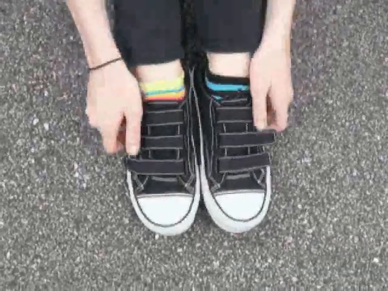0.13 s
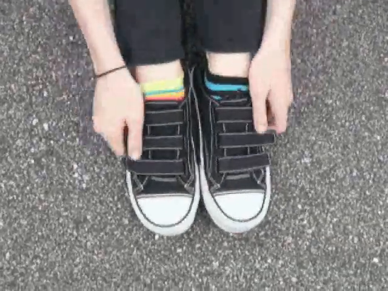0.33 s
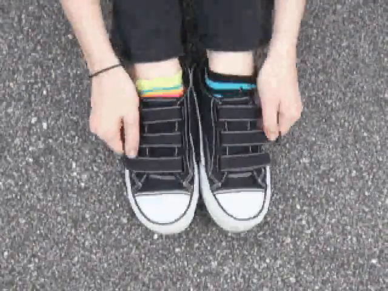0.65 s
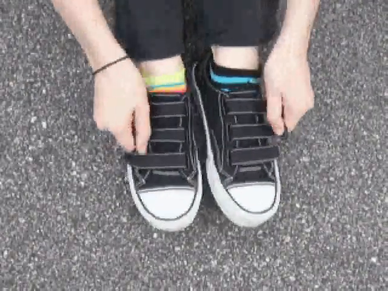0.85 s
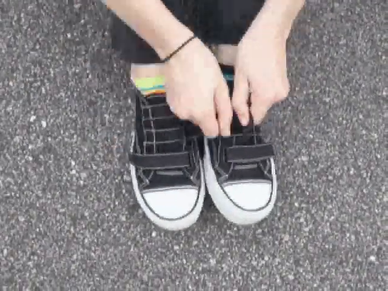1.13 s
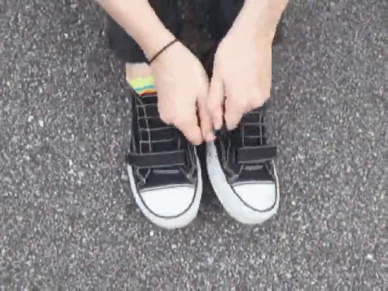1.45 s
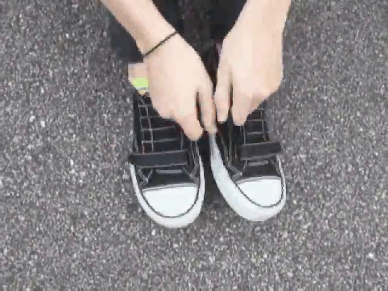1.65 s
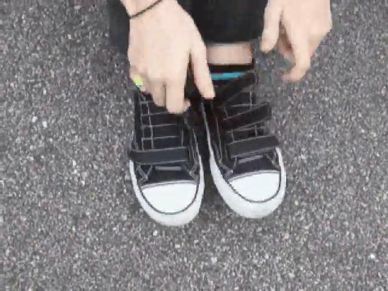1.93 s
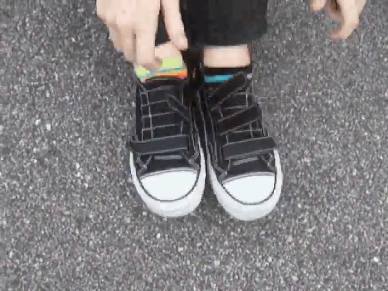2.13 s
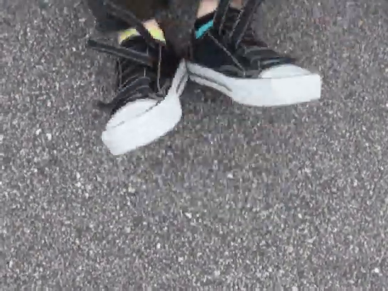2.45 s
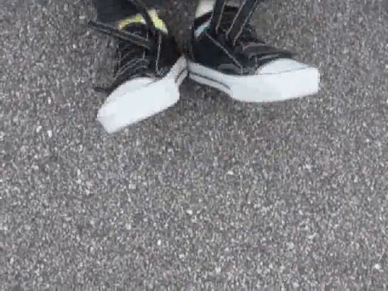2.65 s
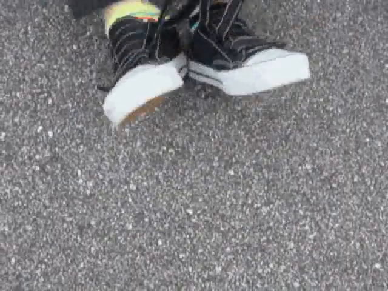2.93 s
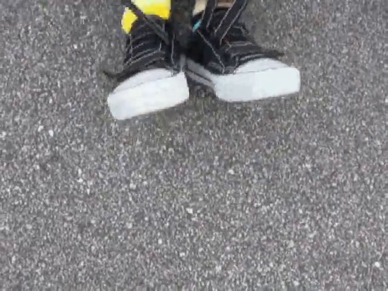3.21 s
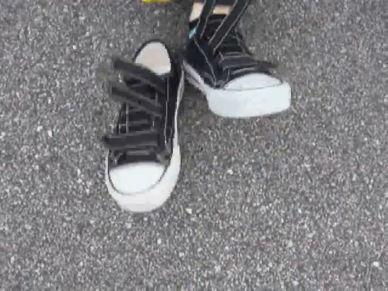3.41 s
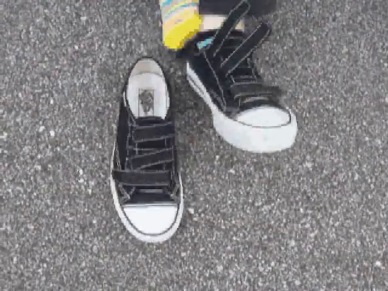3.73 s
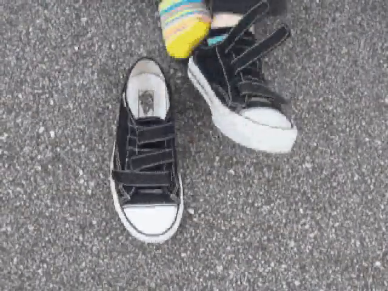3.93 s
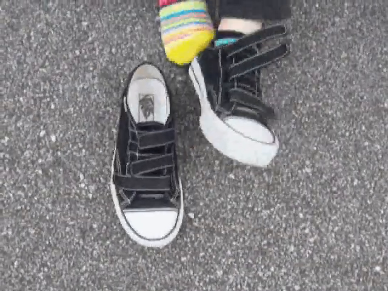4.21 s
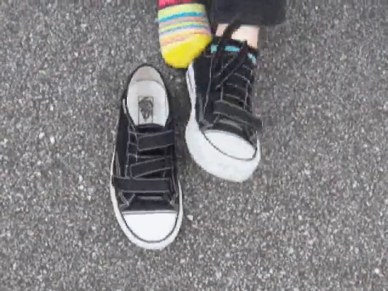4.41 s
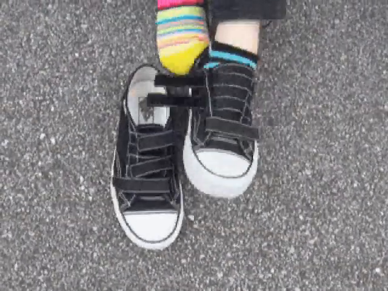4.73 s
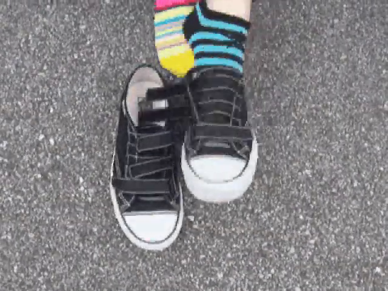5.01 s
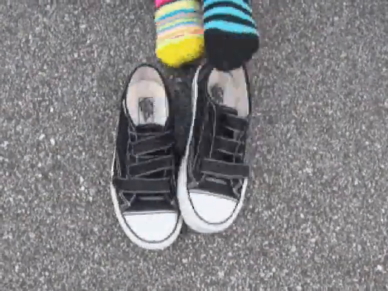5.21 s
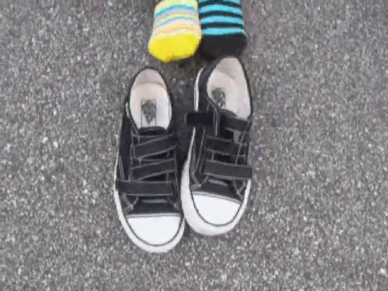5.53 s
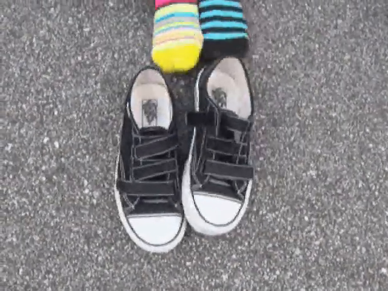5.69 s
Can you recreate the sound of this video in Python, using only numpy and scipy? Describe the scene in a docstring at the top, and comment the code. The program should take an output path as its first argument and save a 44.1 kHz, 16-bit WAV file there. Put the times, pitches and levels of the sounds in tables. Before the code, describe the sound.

Katydids chirr throughout in short, high pulses, about three a second, with a faint cricket trill, a soft outdoor rumble and a low microphone buzz; the top end is thin and glassy. At about 0.6 seconds, close by, single hooks of a sneaker's hook-and-loop strap start snapping. The straps rip open in quick, brightening tugs from 0.7 to 1.2 seconds, with another short rip at 1.3. Between 2.1 and 2.3 seconds rubber squeaks on rubber several times. Socks rub softly out of canvas shoes from 2.5 to 3.4 seconds. At 3.5 a sole slaps onto asphalt, the loudest sound, and settles with a few small bounces. Lighter gritty ticks and knocks come between 4.6 and 4.8 seconds, then a sock slide at 5.0, a soft thud and one more faint rub. From about 5.5 to 5.8 seconds a faint, hoarse note sounds far away, sagging slightly in pitch.

```python
"""Katydids and a cricket call throughout, under a small camera's low buzz and thin glassy top.
Someone sitting on asphalt rips open the hook-and-loop straps of two canvas sneakers: single hooks
snap, then hundreds, ringing the taut strap. After 2 s rubber squeaks on rubber by stick-slip and socks
slide out. At 3.5 s a sole slaps down and rings in its damped modes; softer knocks and slides follow,
and a faint, hoarse note sounds far away at the end."""
import sys
import numpy as np
from scipy import signal
from scipy.fft import rfft, irfft
from scipy.io import wavfile
from scipy.ndimage import uniform_filter1d

SR = 44100
rng = np.random.default_rng(int(sys.argv[2]) if len(sys.argv) > 2 else 0)


def generate_wav(sig):
    """Save sig (samples, or channels by samples) to the path in sys.argv[1] as 16-bit PCM at SR."""
    pcm = np.round(np.clip(np.atleast_2d(sig).T, -1, 1) * 32767).astype(np.int16)
    wavfile.write(sys.argv[1], SR, pcm)


N = 258426
T = np.arange(N) / SR
BAND_HZ, TOP_HZ = 8100, 15950  # upper edges of the camera's band and of its mirror image

# spectrum of a snap on a slack and on a taut strap: f/Hz, level/dB
SLACK_SNAP = [(200, -21), (800, -14), (1150, -7.5), (1330, -8), (1570, 0.5), (1850, -6.5), (2600, 3),
              (3700, -5), (5000, 0.5), (6200, -9.5), (7200, -7), (9000, -16.5)]
TAUT_SNAP = [(150, -12), (400, 0.5), (1200, -8.5), (1550, -2), (1850, -8), (2500, 0), (3200, 0.5),
             (3800, -4), (4900, -2.5), (6000, 0.5), (6700, 2), (7300, 2), (7700, -5.5), (9000, 5.5)]
# resonances of strap and canvas: f/Hz, bandwidth/Hz, gain/dB
STRAP_MODES = [(574, 240, -8), (1012, 128, 4.5)]
# tugs: start/s, end/s, snap level/dB, drumming re snaps/dB, swell/s, fade/s, fade depth/dB
TUGS = [(0.737, 0.785, -28, -29, 0.0033, 0.038, 3), (0.784, 0.827, -26.5, -20, 0.0078, 0.029, 16),
        (0.825, 1.001, -26, -8.5, 0.006, 0.027, 2.5), (0.998, 1.207, -25, -9, 0.013, 0.086, 18.5),
        (1.28, 1.366, -25, -9, 0.062, 0.01, 12)]
# stray hooks crackling ahead of a tug: start/s, end/s, level/dB
CRACKLES = [(0.684, 0.74, -43), (1.249, 1.29, -44)]
# single hooks snapping around the tugs, and one late tick as the foot slides out: t/s, relative level/dB
SINGLE_SNAPS = [(0.6101, -23.5), (0.6279, -20), (0.637, -20), (0.6545, -17.5), (0.6806, -22.5),
                (0.6934, -23), (0.6977, -18.5), (0.7142, -20), (0.7208, -19), (0.7398, -13), (0.8006, -13),
                (0.8302, -13), (1.225, -23), (1.261, -16), (2.9158, -23)]
def straps(taut_s=0.9, tighten_s=0.031, swell_db=15):
    """Impulsive excitation: snapping hooks drive the strap's modes, faster and brighter under tension."""
    tension = (1 + np.tanh((T - taut_s) / tighten_s / 2)) / 2
    slack = snapping(SLACK_SNAP, rate=1700, spread_db=4.0)
    taut = snapping(TAUT_SNAP, rate=3800, spread_db=3.5)
    snaps = np.sqrt(1 - tension) * slack + np.sqrt(tension) * taut
    snaps *= undb(1.1 * walk(200))  # whole rows of hooks give way together
    modes = sum(undb(db) * resonate(snaps, hz, width) for hz, width, db in STRAP_MODES)
    drum = steady(resonate(modes, hz=970, width=910))
    out = np.zeros(N)
    for start, end, db, drum_db, swell, fade, fade_db in TUGS:
        effort_db = db - swell_db * (1 - ramp(start, swell)) - fade_db * ramp(end - fade, fade)
        out += during(start, end, edge=.004) * undb(effort_db) * (snaps + undb(drum_db) * drum)
    strays = snapping(SLACK_SNAP, rate=900, spread_db=8.0)
    for start, end, db in CRACKLES:
        out += during(start, end, edge=.003) * undb(db) * strays
    for s, db in SINGLE_SNAPS:
        add(out, s, undb(db - 3) * click(SLACK_SNAP, ripple_db=2.5))
        for lag in rng.uniform(-0.0026, 0.005, size=4):  # fainter snaps cluster around it
            add(out, s + lag, undb(db - 19) * click(SLACK_SNAP, ripple_db=3.0))
    return out


def snapping(spectrum, rate, spread_db, patches=9):
    """Superposition: patches of hooks let go along the peel line, each with its own impulse response."""
    out = np.zeros(N)
    for _ in range(patches):
        releases = grains(rate / patches, spread_db) * undb(2.5 * walk(22))
        ring = level(click(spectrum, ripple_db=4.0))
        out += signal.oaconvolve(releases, ring)[:N]
    return steady(out, size=700)


# squeaks: t/s, duration/s, first slip rate/Hz, target slip rate/Hz, glide/s, level/dB, roughness (0-1)
RUBBER_SLIPS = [(2.09, 0.017, 1900, 1074, 0.011, -38, 0.75), (2.125, 0.023, 560, 1305, 0.02, -34.5, 0.7),
                (2.148, 0.037, 784, 1344, 0.026, -33.5, 0.4), (2.241, 0.0135, 1150, 1458, 0.015, -39, 0.46),
                (2.264, 0.047, 704, 1632, 0.05, -36.5, 0.69)]
def slipping(fade_db=10.5, clearing=0.83):
    """Slip rate sets pitch: each squeak starts rough, then glides to a cleaner note and fades."""
    hz, rough, gain = np.full(N, 1000.), np.zeros(N), np.zeros(N)
    for start, length, from_hz, to_hz, glide, db, first_rough in RUBBER_SLIPS:
        progress, begun = ramp(start, length), T > start - .002
        bend = np.sin(np.pi / 2 * progress * length / glide) ** 2
        hz = np.where(begun, from_hz + (to_hz - from_hz) * bend, hz)
        rough = np.where(begun, first_rough * (1 - clearing * progress), rough)
        envelope = during(start, start + length, edge=0.0042) * undb(db - fade_db * progress ** 3)
        gain = np.maximum(gain, envelope)
    return hz, np.clip(rough, 0, 1), gain


def squeak(hz, rough, gain):
    """Stick-slip oscillation: rubber on rubber rings the shoe with harmonics; uneven slips rasp."""
    phase = 2 * np.pi * np.cumsum(hz * (1 + 0.192 * rough * walk(900))) / SR
    tone = sum(np.sin(k * phase + k * k) * (k * hz < BAND_HZ) for k in np.arange(1, 10))
    tone *= undb(6.8 * rough * walk(1000))
    rasp = rng.standard_normal(N) * (1 + np.cos(phase))
    shoe = [(300, 1), (600, 4.5), (1300, -1.0), (1900, -6), (2500, -3.5),  # f/Hz, gain/dB
            (3400, -8.0), (4400, -7.5), (5500, -13.5), (8000, -26)]
    return gain * steady(shaped(level(tone) + 0.72 * rough * level(rasp), shoe), size=350)


# soles landing: t/s, thud peak/dB, tick re thud/dB, pitch factor, dulling/(dB per octave)
LANDINGS = [(3.5306, -25, -9, 0.81, -2.5), (3.537, -26, -16, 1.05, 0), (3.5456, -2.5, -14, 0.99, 0),
            (3.5595, -27.5, 2.5, 0.93, 9), (3.640, -27.5, -10, 1.05, 12), (3.668, -34, -1, 1, 2),
            (3.674, -30, -11, 0.7, 7), (4.579, -47, 13.5, 0.81, 0), (4.656, -28, 8.5, 0.88, 7),
            (4.7745, -34, 11.5, 0.91, 3), (5.125, -35, -27, 0.86, 6)]
# modes of the hollow rubber sole: f/Hz, T60/s, level/dB
SOLE_MODES = [(232, 0.0073, -36), (536, 0.0039, -19), (641, 0.019, 6.5), (1017, 0.013, 5.5),
              (1202, 0.0098, 0.5), (1440, 0.047, -32), (2510, 0.019, -13), (3200, 0.0082, -3.5)]
# spectrum of a tick of grit: f/Hz, level/dB
GRIT_TICK = [(400, -33), (1100, 5), (1800, -8.5), (2500, 6), (3300, -7), (4000, -4.5), (5000, -11.5),
             (6200, -9), (9000, -30)]
def slaps():
    """Damped vibration: grit ticks, then the sole lands and thuds, some landings duller than others."""
    out, t = np.zeros(N), T[:SR // 10]
    for s, db, tick_db, pitch, dull_db in LANDINGS:
        thud = np.zeros(len(t))
        for hz, t60, mode_db in SOLE_MODES:
            decay = undb(mode_db - dull_db * np.log2(hz) - 60 * t / t60)
            thud += decay * np.sin(2 * np.pi * hz * pitch * t)
        thud *= 1 - np.exp(-(t / 0.00086) ** 2)  # soft rubber takes a moment to load
        add(out, s + .0006, undb(db) * thud / np.abs(thud).max())
        add(out, s, undb(db + tick_db) * click(GRIT_TICK, ripple_db=1.8))
    return out


# strokes of sock on canvas: peak t/s, level/dB, rise/s, fall/s
SOCK_STROKES = [(2.51, -54, 0.046, 0.021), (2.85, -51.5, 0.042, 0.071), (3.04, -47.5, 0.067, 0.05),
                (3.14, -50, 0.027, 0.032), (3.42, -61, 0.21, 0.12), (4.7, -52, 0.04, 0.05),
                (5.005, -45.5, 0.03, 0.095), (5.35, -55, 0.06, 0.022)]
# spectrum of rubbing cloth: f/Hz, level/dB
CLOTH_RUB = [(200, 2.5), (530, 15.5), (750, 4.5), (1500, -6.5), (2600, 4.5), (4000, -1.5), (6000, -2),
             (7300, -9), (9000, -8)]
def slide():
    """Friction noise: fibres catch and release as a heel works out, in strokes that swell and die away."""
    fibres = grains(rate=2500, spread_db=6)
    power = sum(undb(db) ** 2 * np.exp(-((T - s) / np.where(T < s, rise, fall)) ** 2)
                for s, db, rise, fall in SOCK_STROKES)
    return shaped(fibres, CLOTH_RUB) * np.sqrt(power) * undb(2.2 * walk(45))


# calls of the nearest katydid: t/s
NEAR_CALLS = [.181, .575, .95, 1.30, 1.637, 2.058, 2.389, 2.698, 3.021, 3.365, 3.775, 4.176, 4.529, 4.875,
              5.281, 5.623]
def katydids():
    """Independent sources add: a near katydid, a far one on an even beat and a lower, slower one."""
    far_calls = 0.285 + 0.45 * np.arange(14)
    low_calls = 0.235 + 0.527 * np.arange(11)
    near = katydid(NEAR_CALLS, -51, hz=5070, fall_hz=114.6, length=.009, period=.0415,
                   swell_db=0.96, scrape_hz=90)
    far = katydid(far_calls, -63, hz=5260, fall_hz=232, length=.013, period=.035,
                  swell_db=2.0, scrape_hz=130)
    low = katydid(low_calls, -58, hz=4670, fall_hz=126, length=.01, period=.037,
                  swell_db=1.0, scrape_hz=110)
    return near + far + low


def katydid(calls, call_db, hz, fall_hz, length, period, swell_db, scrape_hz):
    """Stridulation: three wing strokes of rising level, each sinking and fading as the wing slows."""
    out, t = np.zeros(N), T[:SR // 12]
    u = (t - t.mean()) / length  # stroke lengths from the peak
    envelope = np.where(u < 0, 1 / (1 + 3 * u ** 4), 1 / np.sqrt(1 + 3 * u ** 2)) * np.hanning(len(t))
    for s in calls:
        db = call_db + 0.5 * rng.standard_normal()
        for k in range(3):
            scrape = level(uniform_filter1d(rng.standard_normal(len(t)), size=30))
            pitch = hz + 25 * rng.standard_normal() - fall_hz * np.logaddexp(0, 2 * u)
            stroke = np.sqrt(2) * np.sin(phase_of(pitch + scrape_hz * scrape)) * envelope
            add(out, s + k * period - t.mean(), stroke * undb(db + swell_db * k))
    return out


# spectrum of the outdoor air: f/Hz, relative density/dB
AIR_SPECTRUM = [(20, 0), (30, 4), (42, -6), (100, -4), (200, -9), (400, -15.5), (700, -21), (1300, -25.5),
                (2200, -28), (4000, -30), (6000, -32), (7300, -33.5), (9000, -36)]
def air():
    """Ambient noise: a broad spectrum, strongest in the bass, whose level drifts."""
    return level(shaped(rng.standard_normal(N), AIR_SPECTRUM), -43.5) * undb(0.72 * walk(5.1))


def chorus(hz=4825, width=560):
    """Incoherent summation: distant katydids merge into a narrow, throbbing band of noise."""
    strokes = np.cos(phase_of(23 + 3 * walk(4.9)))
    band = level(resonate(resonate(rng.standard_normal(N), hz, width), hz, width))
    return band * undb(-62 + 2.5 * strokes + 1.5 * walk(10))


def cricket():
    """Modulation: the wing beat varies one tone in frequency and amplitude, making a trill."""
    wing = phase_of(50 + .5 * walk(3.4))
    song = np.sin(phase_of(3490 - 50 * np.sin(wing) + 85 * walk(700)))
    return level(song * (1 + .8 * np.cos(wing)), -64) * undb(2.2 * walk(30))


def far_note():
    """Frequency jitter makes a faint, distant note hoarse; its pitch sags a little."""
    hz = np.interp(T, [5.5, 5.8], [1195, 1150]) + 32 * walk(400)
    tone = level(np.sin(phase_of(hz)), -58.5)
    return tone * undb(1.3 * walk(40)) * during(5.47, 5.82, edge=0.072)


def buzz(frame_hz=29.97):
    """Periodic pulses: the camera's electronics tick once a frame, weakly between, over a wavering hum."""
    since = (T - .0287) % (1 / frame_hz)
    between = (since + .5 / frame_hz) % (1 / frame_hz)
    ticks = sum(g * t * np.exp(-t / .0011) for g, t in [(0.86, since), (0.23, between)])
    ticks = -level(ticks - ticks.mean(), -47.5) * undb(1.9 * walk(25))
    hum = -np.cos(2 * np.pi * 2 * frame_hz * since) * (1 + 1.6 * walk(12))
    return ticks + level(hum, -56)


def gain_control(x, threshold_db=-8, share=0.72, attack_s=0.045, recover_db_per_s=0.64):
    """Compression: a peak over the threshold turns the gain down; it creeps back over seconds."""
    excess_db = np.maximum(20 * np.log10(np.abs(x) + 1e-9) - threshold_db, 0)
    recovery_db = recover_db_per_s * T
    cut_db = np.maximum.accumulate(share * excess_db + recovery_db, axis=-1) - recovery_db
    pole = np.exp(-1 / (attack_s * SR))
    return x * undb(-signal.lfilter([1 - pole], [1, -pole], cut_db))


def undb(db):
    """Decibels to amplitude ratio."""
    return 10 ** (np.asarray(db) / 20)


def level(x, db=0):
    """Set the rms level."""
    return x * undb(db) / np.sqrt(np.mean(x ** 2) + 1e-18)


def phase_of(hz):
    """Phase is the time integral of frequency."""
    return 2 * np.pi * np.cumsum(hz) / SR


def ramp(start, length):
    """Linear rise from zero to one."""
    return np.clip((T - start) / max(length, 1e-4), 0, 1)


def during(start, end, edge):
    """Trapezoidal window between two times."""
    return np.clip(np.minimum(T - start, end - T) / edge + .5, 0, 1)


def add(out, s, x):
    """Superpose a short sound at time s."""
    i = max(int(s * SR), 0)
    out[i:i + len(x)] += x[:max(N - i, 0)]


def colour(points, hz):
    """Spectrum level in dB, interpolated over log frequency."""
    f, db = np.transpose(points)
    return np.interp(np.log(hz + 1), np.log(f), db)


def shaped(x, points):
    """Filtering by multiplication of spectra; rms 1."""
    return level(irfft(rfft(x) * undb(colour(points, np.fft.rfftfreq(N, 1 / SR))), N))


def resonate(x, hz, width):
    """Second-order resonance."""
    return signal.lfilter(*signal.iirpeak(hz, hz / width, fs=SR), x)


def click(points, ripple_db, size=512):
    """Minimum-phase impulse response of a spectrum with random ripple; peak 1."""
    hz = np.fft.rfftfreq(size, 1 / SR)
    ripple = level(uniform_filter1d(rng.standard_normal(len(hz)), size=4))
    db = colour(points, hz) + ripple_db * ripple - np.clip((hz - BAND_HZ) / 100, 0, 30)
    cepstrum = irfft(np.log(undb(db)))
    cepstrum[size // 2:] = 0  # makes the click causal
    x = irfft(np.exp(2 * rfft(cepstrum)))
    return x / np.abs(x).max()


def walk(rate):
    """Random fluctuation through `rate` values a second; rms 1."""
    knots = np.arange(0, N / SR + 1, 1 / rate)
    return level(np.interp(T, knots, rng.standard_normal(len(knots))))


def grains(rate, spread_db):
    """Poisson impulses of uneven size."""
    return (rng.random(N) < rate / SR) * undb(spread_db * np.clip(rng.standard_normal(N), -3, 2))


def steady(x, size=1100):
    """Hold the short-term rms near 1 while single grains still stand out."""
    return x / np.sqrt(np.abs(uniform_filter1d(x ** 2, size)) + np.mean(x ** 2) / 20)


def scene():
    """Sound pressures add in one channel: shoes close by, insects and air around."""
    shoes = straps() + squeak(*slipping()) + slaps() + slide()
    return (shoes + katydids() + air() + chorus() + cricket() + far_note())[None]


def record(dry):
    """Spectral imaging: the camera rides its gain, buzzes and samples at half rate, mirroring its band."""
    band = gain_control(dry) + buzz()
    band = signal.sosfilt(signal.butter(14, BAND_HZ - 300, fs=SR, output="sos"), band)
    band = signal.sosfilt(signal.ellip(8, .2, 70, 8700, fs=SR, output="sos"), band)
    mirror = band * np.cos(np.pi * np.arange(N)) * undb(-5)  # f becomes SR/2 - f: the glassy top
    return signal.sosfilt(signal.ellip(12, .2, 80, TOP_HZ, fs=SR, output="sos"), band + mirror)


dry = scene()
out = record(dry)
generate_wav(out)
```